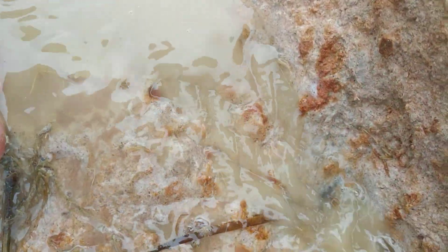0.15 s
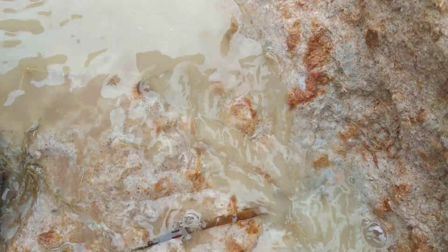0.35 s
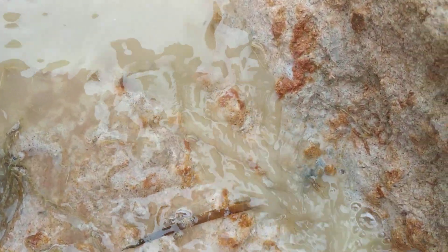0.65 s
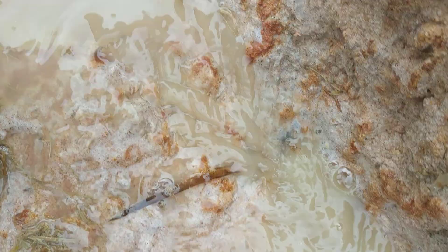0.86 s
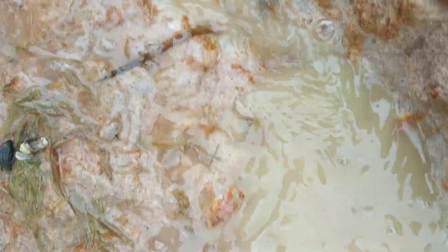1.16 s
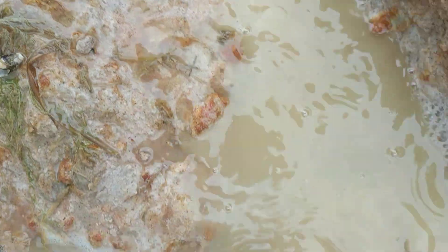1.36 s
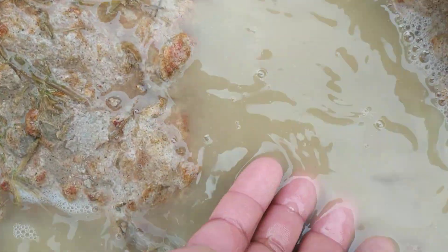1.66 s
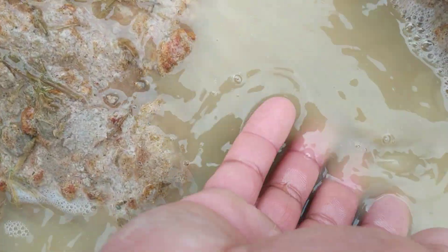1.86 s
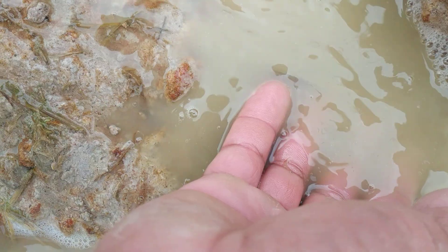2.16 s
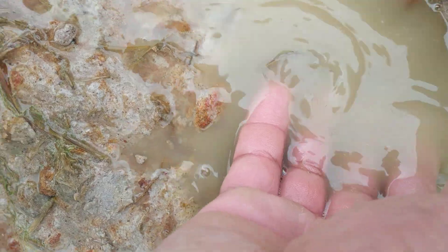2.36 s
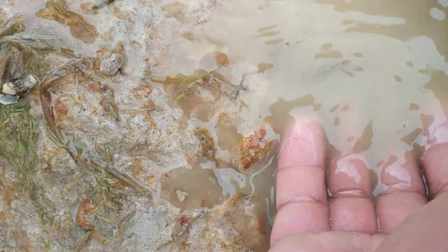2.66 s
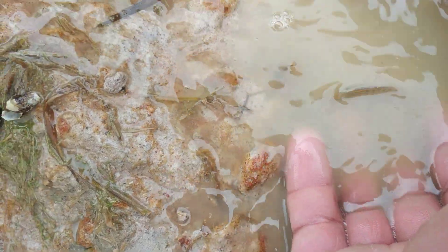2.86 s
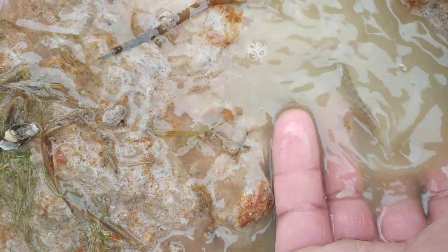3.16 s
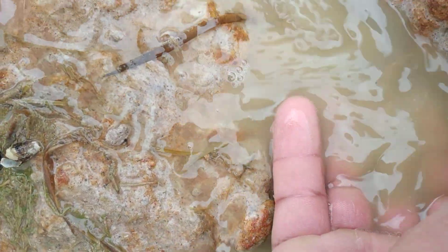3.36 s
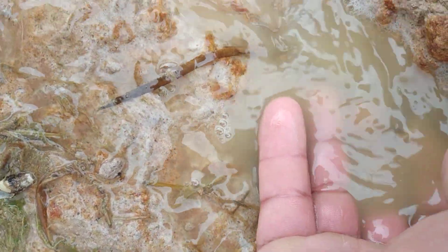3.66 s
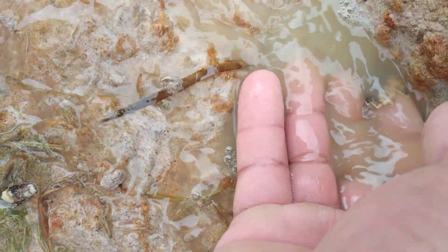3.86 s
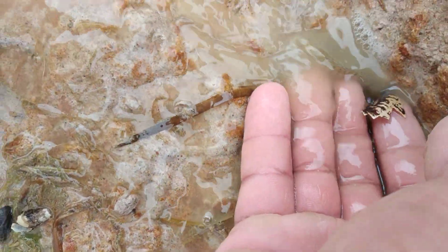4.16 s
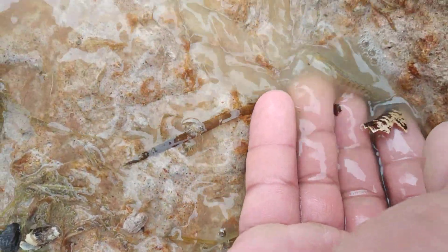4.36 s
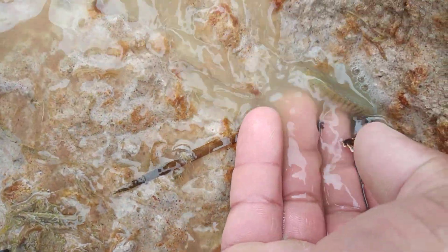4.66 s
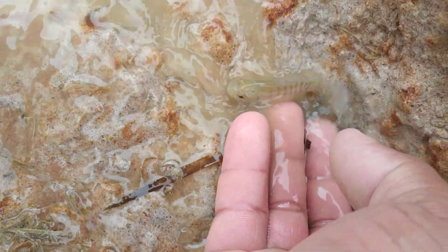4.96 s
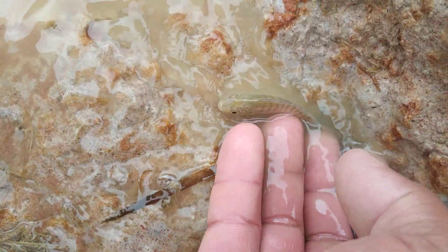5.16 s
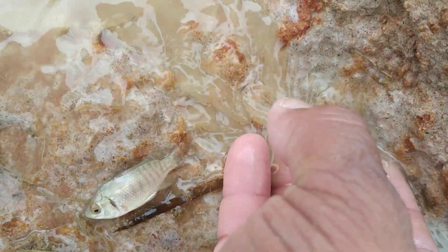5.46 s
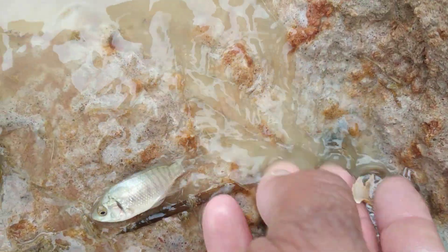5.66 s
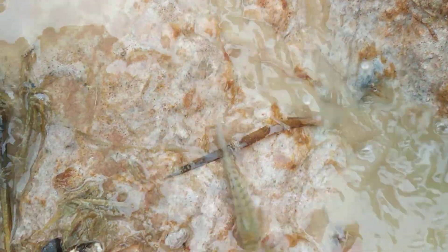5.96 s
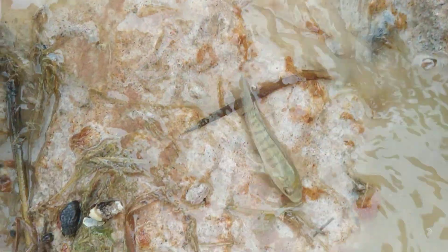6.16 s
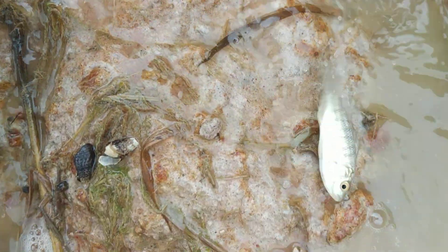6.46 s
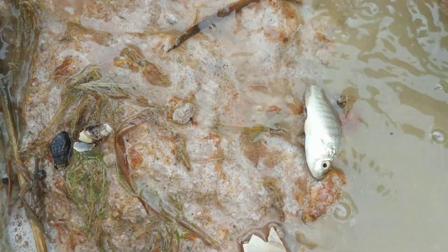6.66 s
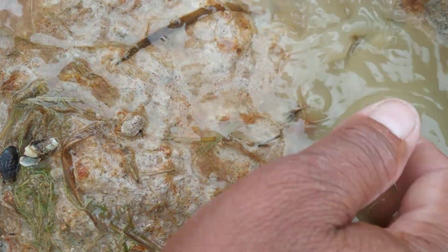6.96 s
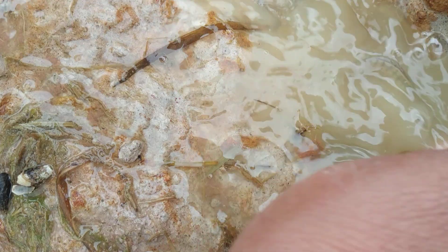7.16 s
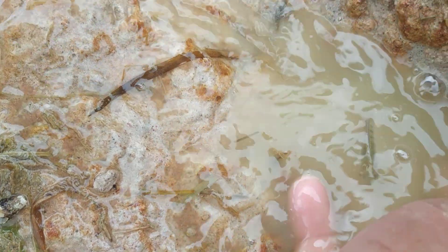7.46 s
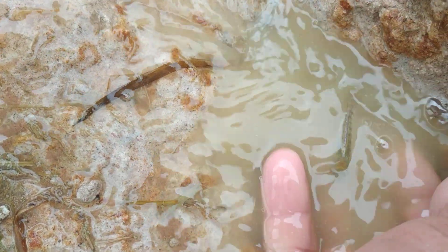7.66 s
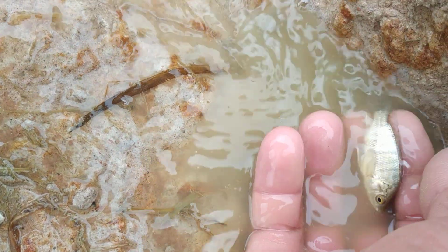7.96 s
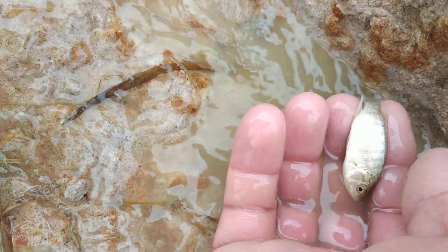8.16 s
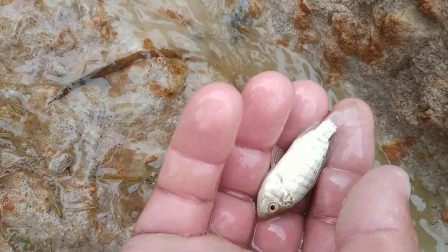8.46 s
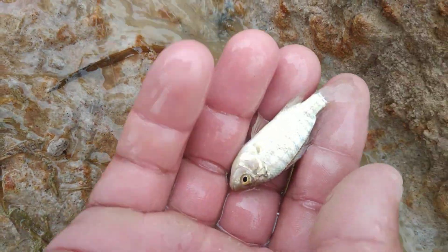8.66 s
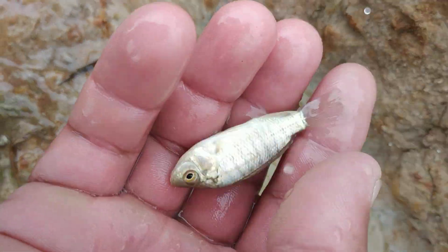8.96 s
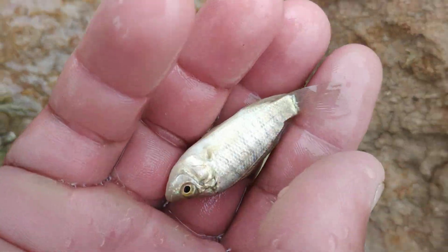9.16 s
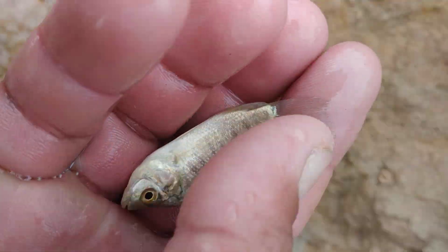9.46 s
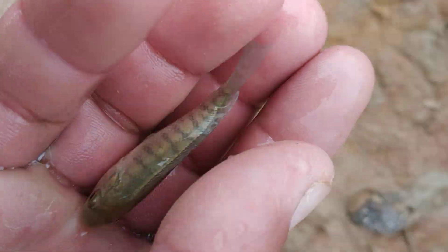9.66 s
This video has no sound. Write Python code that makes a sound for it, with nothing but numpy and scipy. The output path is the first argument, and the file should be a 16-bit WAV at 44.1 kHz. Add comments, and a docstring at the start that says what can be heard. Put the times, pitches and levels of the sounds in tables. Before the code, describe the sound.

Shallow water trickles and sloshes as a hand scoops through it, with bubbly plinks, small splashes and wind gusts on the microphone.

```python
"""At a shallow, trickling pool, a hand scoops through the water near a phone with two microphone ports.
Gusts buffet each port on its own over a far hum and a thin hiss, and a finger taps near the right one.
Trapped bubbles ring as plinks, air pockets squelch shut, drops splat and froth fizzes,
mostly at the left port."""
import sys
import numpy as np
from scipy import signal
from scipy.fft import rfft, irfft, next_fast_len
from scipy.io import wavfile
from scipy.ndimage import uniform_filter1d, map_coordinates

SR = 44100
rng = np.random.default_rng(int(sys.argv[2]) if len(sys.argv) > 2 else 0)


def persist_wave(psi):
    """Save psi, clipped to +-1, as 16-bit WAV."""
    counts = np.round(np.clip(psi, -1, 1) * 32767).astype(np.int16)
    wavfile.write(sys.argv[1], SR, np.atleast_2d(counts).T)


N = 433062


def amp(db):
    """Turns decibels into a number to multiply by."""
    return 10 ** (np.asarray(db) / 20)


def unit(x):
    """Brings each row to an average (rms) level of 1."""
    return x / np.sqrt(np.mean(x ** 2, axis=-1, keepdims=True) + 1e-20)


def along(points, hz):
    """Reads between (frequency, value) points, with octaves evenly spaced."""
    f, values = np.transpose(points)
    return np.interp(np.log(hz + 1), np.log(f + 1), values)


def curves(rows):
    """Joins timed rows with straight lines: one curve for each column after the time."""
    times, *columns = np.transpose(rows)
    return np.array([np.interp(np.arange(N) / SR, times, column) for column in columns])


def wobble(rate):
    """A smooth curve through rate random points a second."""
    return map_coordinates(rng.standard_normal(int(N * rate / SR) + 4), [np.arange(N) * rate / SR])


def filtered(x, response):
    """Turns each frequency of x up or down by response(hz)."""
    size = next_fast_len(N + 8192)
    return irfft(rfft(x, size) * response(np.fft.rfftfreq(size, 1 / SR)), size)[..., :N]


def place(times, sounds):
    """Adds short sounds to one track, each from its start time."""
    at = np.round(np.asarray(times) * SR).astype(int)[:, None] + np.arange(sounds.shape[1])
    return np.bincount(np.clip(at, 0, N).ravel(), sounds.ravel(), N + 1)[:N]


def place_stereo(times, sounds, left_db, right_db, lag):
    """Both ports hear each sound, the left one lag seconds later (earlier if negative)."""
    left = place(times + lag, sounds * amp(left_db)[:, None])
    right = place(times, sounds * amp(right_db)[:, None])
    return np.array([left, right])


def bubble_tones(hz, fade, rise, size):
    """A bubble rings higher as it nears the surface, dying by 60 dB in fade seconds."""
    t, hz, fade, rise = np.arange(size) / SR, hz[:, None], fade[:, None], rise[:, None]
    tone = np.sin(2 * np.pi * hz * t * (0.965 + rise * t / fade))
    return tone * amp(-60 * t / fade) * (1 - np.exp(-t * hz / 2.53))


def bursts(hz, fade, width, size):
    """Bursts of noise centred on hz, dying by 60 dB in fade seconds."""
    t, f = np.arange(size) / SR, np.fft.rfftfreq(size, 1 / SR)
    band = np.exp(-.5 * (np.log((f + 1) / hz[:, None]) / width) ** 2)
    noise = irfft(rfft(rng.standard_normal((len(hz), size))) * band, size)
    return unit(noise) * amp(-60 * t / fade[:, None]) * (1 - np.exp(-t / 0.0007))


# Tone of the background at each port: f/Hz, relative level/dB
AIR_TONE_LEFT = [(40, -21.5), (110, -9), (220, 10), (330, -4.5), (540, -11.5), (700, -5.5), (860, -15),
                 (990, -12), (1500, -17), (2000, -12.5), (2500, -24), (2830, -19), (3300, -27), (5500, -25),
                 (7200, -29.5), (9400, -25.5), (10200, -28.5), (12300, -28.5), (13100, -24.5),
                 (15500, -30.5)]
AIR_TONE_RIGHT = [(40, -70), (110, -8.5), (220, 7), (330, 4), (540, -9), (700, -7.5), (860, -12),
                  (990, -23), (1500, -20), (2000, -21), (2830, -28.5), (3300, -26.5), (5500, -32.5),
                  (9400, -32.5), (10200, -32), (12300, -28.5), (13100, -21), (15500, -32)]
def air(flutter_db=2.6):
    """A far hum, alike at both ports, under a finely fluttering hiss that each has to itself."""
    spectrum = signal.stft(rng.standard_normal((2, N)), nperseg=512)[2]
    patches = uniform_filter1d(rng.standard_normal(spectrum.shape[1:]), 6, axis=0)
    patches = uniform_filter1d(patches, 3, axis=1)
    noise = signal.istft(spectrum * amp(flutter_db * patches / np.std(patches)), nperseg=512)[1][:, :N]
    width = lambda hz: np.arccos(along([(300, 1.0), (700, 0)], hz).clip(0, 1)) / 2
    shared, side = filtered(noise, lambda hz: np.array([np.cos(width(hz)), np.sin(width(hz))]))
    tone = lambda hz: amp([along(AIR_TONE_LEFT, hz), along(AIR_TONE_RIGHT, hz)])
    pair = filtered(np.array([shared + side, shared - side]), tone)
    return amp(-38.0) * pair / np.std(pair[1])


# Wind strength before the bass cut: t/s, left level/dB, right level/dB
RUSH_LEVELS = [(0, -22, -34.5), (.5, -33.5, -38), (1, -29, -37), (1.4, -35, -37), (2, -38.5, -42),
               (3, -33.5, -33), (3.75, -31.5, -33.5), (4.3, -31, -30.5), (4.75, -20, -31),
               (5.02, -19, -26.5), (5.25, -65, -25), (5.5, -20, -43), (5.75, -26, -29.5), (6.05, -25, -36),
               (6.5, -43, -42), (7, -36, -40.5), (8.3, -42, -51), (9.1, -31, -45), (9.82, -48, -52)]
# Its tone before the bass cut: f/Hz, relative level/dB
RUSH_TONE = [(18, -72), (30, -33), (65, 5.5), (232, 8.5), (485, -7), (553, -8.5), (918, -26.5),
             (1030, -30.5), (1500, -42), (1950, -80), (3300, -120)]
def wind_rush():
    """Air swirling at each port makes a low, lumpy rush."""
    lumps = amp(3.5 * np.array([wobble(40), wobble(40)]))
    rush = filtered(rng.standard_normal((2, N)), lambda hz: amp(along(RUSH_TONE, hz)))
    return amp(curves(RUSH_LEVELS)) * unit(lumps * rush)


# Puffs before the bass cut: t/s, level/dB, length/s, rasp against the puff/dB, port (0 left, 1 right)
WIND_PUFFS = [(.033, -12.5, 0.0073, -13, 0), (0.073, -9, 0.0052, -17, 0), (0.113, -17, 0.01, -20, 0),
              (0.127, -6, 0.0054, -18.5, 0), (0.319, -21, 0.0051, -34, 0), (0.39, -14.5, 0.0095, -39, 0),
              (0.538, -20, 0.01, -30, 0), (0.603, -13, 0.0058, -21, 0), (0.822, -34, 0.012, -9, 1),
              (.851, -3.5, 0.0041, -38, 0), (0.854, -24, 0.065, -20, 1), (0.902, -21.5, 0.02, -12, 0),
              (0.913, -6.5, 0.0046, -22, 0), (0.93, -20, 0.01, -10, 0), (0.967, -13.5, 0.0077, -25, 0),
              (1.016, -13.5, 0.0051, -45, 0), (1.094, -14, 0.008, -15, 0), (1.103, -10.5, 0.011, -12, 0),
              (1.284, -21, 0.015, -43, 0), (1.522, -15, 0.0052, -50, 0), (2.438, -15.5, 0.019, -56, 0),
              (3.759, -16, 0.0067, -20, 0), (3.893, -12.5, 0.0064, -23, 0), (3.922, -12, 0.0059, -30, 0),
              (3.969, -15, 0.0083, -33, 0), (4.02, -19, 0.016, -50, 0), (4.148, -9, 0.01, -13, 0),
              (4.164, -15.5, 0.016, -9, 0), (4.4, -13, 0.0087, -18, 0), (4.51, -22, 0.0053, -5, 1),
              (4.547, -17.5, 0.016, -13, 1), (4.624, -8, 0.0062, -37, 0), (4.644, -9.5, 0.015, -16, 0),
              (4.684, -8, 0.0036, -33, 0), (4.703, -12, 0.013, -41, 0), (4.717, -15, 0.0072, -32, 0),
              (4.735, -12, 0.0089, -19, 0), (4.766, -8.5, 0.0057, -34, 0), (4.801, -12.5, 0.014, -3.5, 0),
              (4.84, -16.5, 0.008, -3.5, 0), (4.866, -10, 0.0057, -32, 1), (4.883, -12.5, 0.011, -18, 0),
              (4.962, -11.5, 0.0054, -11, 0), (4.975, -18, 0.04, -29, 1), (5.008, -9.5, 0.013, 0, 0),
              (5.013, -13, 0.004, -3, 1), (5.029, -14, 0.011, -18, 0), (5.118, -25, 0.016, -13, 1),
              (5.173, -24, 0.027, -5.5, 1), (5.233, -20, 0.027, -23, 1), (5.459, -18.5, 0.023, -37, 0),
              (5.476, -7, 0.004, -19, 0), (5.492, -13, 0.014, -16, 0), (5.509, -10.5, 0.0072, -14, 0),
              (5.653, -14.5, 0.0088, -29, 1), (5.763, -19, 0.012, -31, 0), (5.834, -11, 0.018, -27, 0),
              (5.873, -18.5, 0.0067, -9, 1), (5.916, -18.5, .009, -16, 0), (5.971, -18.5, 0.019, -13, 0),
              (6.124, -16, 0.0083, -15, 0), (6.146, -11.5, 0.011, -21, 0), (6.171, -15, 0.022, -25, 0),
              (6.398, -17.5, 0.008, -39, 0), (6.448, -13.5, 0.0044, -56, 0), (6.501, -18, 0.0096, -46, 0),
              (7.014, -16, 0.0077, -53, 0), (7.073, -17.5, .007, -40, 0), (7.259, -13, 0.0068, -49, 0),
              (8.199, -15.5, 0.0063, -35, 0), (8.829, -14.5, 0.0089, -28, 0), (9.214, -17, 0.0075, -32, 0),
              (9.365, -12.5, 0.016, -23.5, 0)]
def wind_puffs(smooth_hz=226.6):
    """Single pushes of air hit one port: they come fast, rasp at their peak and ring down."""
    times, db, length, rasp_db, port = np.transpose(WIND_PUFFS)[:, :, None]
    scatter = np.exp(.07 * rng.standard_normal(times.shape))
    hz = smooth_hz * (1 + 0.48 * amp(rasp_db)) * scatter  # raspy puffs are higher
    t = np.arange(-1500, 2600) / SR
    offset = rng.random((len(times), 2, 1))
    past_peak = t / length + 0.19
    swell = np.exp(-np.where(past_peak < 0, 3.2, 1.9) * abs(past_peak) ** 1.3)
    waver = 0.5 * np.sin(2 * np.pi * (0.538 * hz * t + offset[:, 1]))
    phase = 2 * np.pi * (hz * t + offset[:, 0]) + waver
    overtones = amp(rasp_db / 3) * swell * (np.cos(2 * phase) + 0.26 * swell * np.cos(3 * phase))
    push = np.sqrt(2) * swell * (np.cos(phase) + 0.78 * overtones)
    rasp_band = signal.butter(3, [330, 850], "band", fs=SR, output="sos")
    rasp = unit(signal.sosfilt(rasp_band, rng.standard_normal(swell.shape)))
    puffs = amp(db) * (push + amp(rasp_db) * swell ** 3 * rasp)
    return np.array([place(times[:, 0] + t[0], puffs * (port == side)) for side in range(2)])


def wind():
    """Rush and puffs together; the phone's wind filter cuts their deep bass."""
    bass_cut = signal.butter(4, 168, "high", fs=SR, output="sos")
    return signal.sosfilt(bass_cut, wind_rush() + wind_puffs())


def bubble_crowd(centre_hz, scatter, cycles, wet, count):
    """Many short bubbles at random times, places, pitches and sizes, each with a wet tick."""
    when, rise, delay = rng.random((count, 3)).T
    pitch, damping, side, loudness = rng.standard_normal((count, 4)).T
    hz = (centre_hz * np.exp(scatter * pitch)).clip(900, 15000)
    db = 5 * loudness.clip(-3, 1.3)
    fade = cycles / hz * np.exp(0.3 * damping)
    rings = bubble_tones(hz, fade, 0.2 * rise ** 3, size=640)
    ticks = wet * bursts(hz, fade, width=0.18, size=640)
    pair = place_stereo(when * N / SR, rings + ticks, db, db + 5.3 * side, lag=-.00045 * delay)
    return pair / np.std(pair)


# Flow before the ports colour it: t/s, large bubbles' level/dB, small bubbles' level/dB
TRICKLE_LEVELS = [(0, -51, -60), (.7, -44.5, -52), (1.3, -52.5, -59.5), (2.3, -51, -54),
                  (3.6, -49.5, -56.5), (4.3, -45.5, -58), (4.9, -47, -61.5), (5.7, -43, -50),
                  (6.4, -47, -50), (7.5, -48, -57.5), (8.4, -48.5, -59.5), (9.82, -52.5, -52.5)]
# How each port colours the trickle: f/Hz, boost/dB
TRICKLE_TONE_LEFT = [(1000, -20.5), (2100, 2), (2500, 1), (2850, -15.5), (3500, 3.5), (4500, 2), (7000, 8),
                     (10000, 4), (15500, 11.5)]
TRICKLE_TONE_RIGHT = [(1000, -4.5), (2100, -5.5), (2500, -1), (2850, 0), (3500, -10.5), (7000, 1.5),
                      (10000, -29), (13500, 11), (15500, -14)]
def trickle():
    """Running water makes clumps of large and small bubbles, with fine spatter above."""
    large_db, small_db = curves(TRICKLE_LEVELS)
    large_flow = amp(large_db + 2 * wobble(5) + 2.5 * wobble(25))
    large = large_flow * bubble_crowd(2050, scatter=.17, cycles=22, wet=0.55, count=2600)
    small_flow = amp(small_db + 2.5 * wobble(7))
    small = small_flow * bubble_crowd(3600, scatter=.15, cycles=36, wet=.9, count=3200)
    spatter_flow = amp(small_db - 6.5 + 5.1 * wobble(16))
    spatter = spatter_flow * bubble_crowd(9080, scatter=0.34, cycles=74, wet=2.9, count=450)
    tone = lambda hz: amp([along(TRICKLE_TONE_LEFT, hz), along(TRICKLE_TONE_RIGHT, hz)])
    return filtered(large + small + spatter, tone)


# Touches on the phone's case: t/s, right level/dB, f/Hz
FINGER_TAPS = [(6.398, 8.5, 1430), (6.4, -6, 2600), (6.4201, -8, 2230), (6.4298, -13, 2000),
               (6.4346, -12, 1800), (6.436, 7, 1680), (6.4375, -8, 1900), (6.4397, -4, 1450),
               (6.4443, -8, 1780), (6.4875, -18, 2400), (6.4928, 2.5, 2130), (6.4957, -5, 2170),
               (6.5002, -9, 1730), (6.512, 1.5, 1510), (6.5229, -1.5, 1690), (6.526, -9, 1900),
               (6.542, -10, 2770), (8.3, -9, 2830), (8.3036, 8.5, 2280), (8.3044, -13, 2260),
               (8.3098, -1, 1870), (8.3111, 2.5, 1710), (8.315, -10, 1600), (8.319, -9, 1800),
               (8.3242, -6, 3020), (8.327, -4, 2940), (8.346, -8, 2360), (8.3517, 8, 2660),
               (9.019, -9, 1480)]
def finger_taps(ring_fade_s=0.002, crackle_fade_s=0.0067):
    """A finger knocks the case: a very short ring, a dull thud under it and a crackle."""
    times, db, hz = np.transpose(FINGER_TAPS)
    t = np.arange(512) / SR
    shape = amp(-60 * t / ring_fade_s) * (1 - np.exp(-t / .0002))
    ring = -np.sin(2 * np.pi * hz[:, None] * t) * shape
    thud = -0.19 * np.sin(2 * np.pi * 700 * t) * shape
    crackle = 0.22 * bursts(0.98 * hz, np.full(len(times), crackle_fade_s), width=1.0, size=512)
    pair = place_stereo(times, ring + thud + crackle, db - 26, db, lag=0.00015)
    return signal.sosfilt(signal.butter(2, 350, "high", fs=SR, output="sos"), pair)


# Fizz after a scoop: middle t/s, length/s, left level/dB, centre f/Hz
FROTH_PATCHES = [(0.485, 0.13, -50, 4800), (0.781, 0.034, -38.5, 5500), (4.911, 0.042, -34, 2200),
                 (4.925, 0.034, -31.5, 5370), (5.012, 0.067, -43.5, 4900), (5.383, 0.092, -38, 2300),
                 (5.401, 0.086, -38.5, 5170), (5.842, 0.043, -42, 7960), (5.937, 0.03, -41.5, 8100),
                 (6.233, 0.033, -37.5, 12500), (6.252, 0.043, -37.5, 4400), (6.28, 0.053, -48, 7300),
                 (6.502, 0.11, -49, 8000), (8.04, 0.061, -50, 10100), (8.309, 0.026, -32, 6950),
                 (9.713, 0.018, -30.5, 2800), (9.74, 0.045, -39, 7500)]
def froth():
    """Bursting froth makes a grainy hiss that swells and fades, much nearer the left port."""
    times, length, db, hz = np.transpose(FROTH_PATCHES)
    t = np.arange(-4096, 4096) / SR
    swell = np.exp(-2.5 * (t / length[:, None]) ** 2) * amp(db)[:, None]
    no_fade = np.full(len(times), np.inf)
    hiss = [place(times + t[0], swell * bursts(hz, no_fade, width=.55, size=8192)) for _ in range(2)]
    grain = amp(2.8 * wobble(300))
    return np.array(hiss) * grain * amp([[0], [-11]])


# Air pockets closing under the hand: t/s, left level/dB, start f/Hz, end f/Hz, length/s
AIR_POCKETS = [(5.334, -12.5, 1980, 5500, 0.0078), (5.355, -9.5, 1720, 4250, 0.0092),
               (5.447, -30, 2030, 3000, 0.0087), (5.46, -14.5, 3400, 5230, 0.0068),
               (7.054, -32.5, 950, 1600, .02)]
def squelches():
    """An air pocket is squeezed shut: a wet tone swells, sweeps up ever faster and fades."""
    times, db, start_hz, end_hz, length = np.transpose(AIR_POCKETS)[:, :, None]
    progress = np.arange(1024) / SR / length
    hz = start_hz * (end_hz / start_hz) ** (progress.clip(0, 1) ** 2)
    roughness = 1 + 0.42 * unit(uniform_filter1d(rng.standard_normal(progress.shape), size=12))
    swell = (1 - np.exp(-progress / 0.24)) * np.exp(-3 * progress ** 2)
    tones = roughness * swell * np.sin(2 * np.pi * np.cumsum(hz, axis=1) / SR)
    return place_stereo(times[:, 0], tones, db[:, 0], db[:, 0] - 9, lag=-0.000033)


# Bursting drops: t/s, left level/dB, centre f/Hz, fade/s
DROPS = [(0.034, -23, 6920, 0.0051), (0.441, -19.5, 5500, 0.0043), (0.487, -28.5, 6000, 0.024),
         (1.226, -29, 8450, 0.0089), (1.459, -29.5, 6700, 0.01), (2.2862, -27, 8340, 0.0067),
         (2.3796, -26, 7390, 0.012), (2.654, -26, 6720, 0.011), (3.011, -20, 5430, 0.0057),
         (3.4965, -9, 6260, 0.0017), (3.6207, -34.5, 8850, 0.11), (3.772, -24.5, 8850, 0.02),
         (3.957, -24.5, 8850, 0.045), (3.998, -24.5, 9100, 0.02), (4.8819, -5.5, 7040, 0.005),
         (4.9256, -24, 6200, 0.015), (4.908, -17, 8000, 0.0099), (4.947, -18, 7000, 0.0097),
         (4.9862, -21, 7600, 0.016), (5.011, -14, 7800, 0.0095), (5.3666, -11, 7350, 0.01),
         (5.387, -14, 8300, 0.018), (5.425, -24, 8780, 0.032), (5.46, -23, 7200, 0.017),
         (5.82, -13.5, 9050, 0.031), (5.863, -11.5, 9640, 0.0088), (5.9217, -12.5, 10300, 0.017),
         (6.017, -29, 10670, .015), (6.048, -4, 5500, 0.0027), (6.092, -17.5, 11100, 0.014),
         (6.3676, -14.5, 8900, 0.022), (6.377, -19, 11000, 0.049), (6.402, -19, 7000, 0.028),
         (6.437, -17, 12000, 0.0074), (6.526, -12.5, 9550, 0.0075), (6.551, -19, 11000, .008),
         (6.5654, -25.5, 11720, .017), (6.607, -28, 10920, 0.02), (6.672, -26.5, 10600, 0.098),
         (6.739, -21.5, 13900, 0.016), (6.9013, -26, 9000, 0.018), (7.34, -28, 11500, 0.011),
         (7.376, -29, 7000, 0.0071), (7.58, -24, 8000, 0.0097), (7.592, -23.5, 7000, 0.0067),
         (7.961, -15, 14000, 0.0048), (7.983, -18.5, 11090, 0.0066), (8.0026, -26, 8130, .015),
         (8.011, -25, 13080, 0.035), (8.048, -20, 10020, 0.011), (8.075, -21, 9000, 0.0083),
         (8.2576, -22, 14000, 0.0066), (8.3034, -4, 11000, 0.0065), (8.3167, -3, 8290, 0.0052),
         (8.341, -13.5, 9310, 0.02), (8.422, -24, 5350, 0.0072), (8.792, -16, 4460, 0.0067),
         (8.9428, -17.5, 9700, 0.019), (9.04, -27, 13000, .012), (9.118, -22, 8640, 0.014),
         (9.191, -29, 13000, .012), (9.47, -29, 9000, 0.021), (9.705, -14, 12500, 0.062),
         (9.7815, -19, 8000, 0.016)]
def splats(right_db=-14.5):
    """Each drop bursts in a short, bright noise, weaker at the right port."""
    times, db, hz, fade = np.transpose(DROPS)
    return np.array([place(times, bursts(hz, fade, width=0.78, size=4096) * amp(level)[:, None])
                     for level in (db, db + right_db)])


# Bubbles that stand out: t/s, left level/dB, f/Hz
PLINKS = [(0.1234, -23.5, 2120), (.194, -26.5, 1740), (0.265, -23, 2150), (.321, -31, 2100),
          (.345, -21.5, 2110), (0.449, -21.5, 1680), (0.469, -23, 1720), (0.477, -26, 3300),
          (0.49, -22, 2550), (.637, -20.5, 3530), (.705, -26, 2170), (0.7257, -20.5, 1980),
          (0.7484, -26, 2210), (0.779, -21.5, 1670), (.9807, -24, 4240), (1.226, -24, 1490),
          (1.7479, -29, 3590), (1.8477, -25.5, 2210), (1.849, -22, 3550), (1.9312, -21, 2180),
          (2.0715, -26, 1840), (2.545, -26.5, 2250), (2.58, -25.5, 2020), (2.6885, -23.5, 1960),
          (2.829, -26, 1910), (3.011, -16.5, 6400), (3.0126, -25.5, 1970), (3.176, -21, 2160),
          (3.214, -22.5, 2180), (3.4943, -15, 2200), (3.6182, -24, 1870), (3.6933, -20, 2090),
          (3.7728, -23, 2030), (3.897, -25, 1780), (3.923, -22.5, 1800), (3.9564, -28, 1740),
          (3.9907, -24, 2070), (4.3973, -17, 2190), (4.4762, -25.5, 2240), (4.5487, -26, 2370),
          (4.5667, -21, 2420), (4.572, -19.5, 1800), (4.5878, -17, 2270), (4.6223, -26, 1850),
          (4.6383, -17, 2220), (4.75, -26, 2270), (4.789, -23.5, 2240), (4.885, -16.5, 2200),
          (4.896, -22, 1900), (4.9028, -17, 2180), (4.914, -4, 3850), (4.917, -19, 6070), (4.926, -8, 4680),
          (4.9335, -15, 7500), (4.937, -11.5, 7950), (4.966, -19, 2440), (4.987, -10.5, 4030),
          (5.0098, -9.5, 4100), (4.9922, -17, 2940), (5.026, -21, 2420), (5.037, -16, 4300),
          (5.0469, -21, 2380), (5.097, -24, 2200), (5.123, -19, 1760), (5.132, -20, 2160),
          (5.145, -29, 1830), (5.1906, -29, 2380), (5.212, -23.5, 4170), (5.251, -24, 4140),
          (5.257, -24, 2540), (5.3456, -12, 4080), (5.368, -6, 4540), (5.3883, -5, 4500),
          (5.4084, -7.5, 2840), (5.414, -21, 1620), (5.425, -10.5, 4020), (5.573, -21.5, 2200),
          (5.6106, -28, 2400), (5.7613, -31, 2500), (5.8207, -14, 1850), (6.0486, -9.5, 4200),
          (6.093, -18, 3860), (6.226, -25, 1570), (6.253, -20, 1790), (6.274, -24, 2220),
          (6.305, -33, 1860), (6.3296, -23, 2300), (6.3653, -15, 4300), (6.543, -20, 2900),
          (6.6872, -27, 2150), (6.854, -22.5, 4700), (6.896, -15.5, 3670), (6.966, -25.5, 1120),
          (7.034, -17.5, 720), (7.054, -20.5, 2630), (7.375, -22.5, 1140), (7.537, -23.5, 2400),
          (7.375, -22.5, 2190), (7.6428, -23, 1090), (7.6424, -19, 1950), (7.7018, -22.5, 2470),
          (7.7853, -21, 2420), (8.1372, -28, 1770), (8.1606, -19.5, 2400), (8.2657, -21.5, 5030),
          (8.4204, -23, 1980), (8.4731, -25.5, 2400), (8.7033, -27, 1820), (8.7913, -16.5, 2370),
          (8.884, -28, 2010), (9.471, -22, 2090), (9.7026, -5.5, 3730)]
# Smaller, higher bubbles die sooner: f/Hz, fade/s
PLINK_FADES = [(1200, 0.024), (2200, 0.022), (4500, 0.008)]
# The high ones burst near the left port: f/Hz, left minus right level/dB
PLINK_SIDES = [(2200, 5.5), (3500, 19.5)]
def plinks():
    """Single bubbles ring with a wet slap; the louder the bubble, the bigger the slap's share."""
    times, db, hz = np.transpose(PLINKS)
    fade = along(PLINK_FADES, hz)
    rise = 0.02 + 0.2 * rng.random(len(times)) ** 2
    rings = bubble_tones(hz, fade, rise, size=1024)
    slaps = (0.21 + 0.4 * amp(db / 2))[:, None] * bursts(hz, fade, width=0.5, size=1024)
    return place_stereo(times, rings + slaps, db, db - along(PLINK_SIDES, hz), lag=-0.00011)


def scene():
    """Everything that reaches the two ports, added together."""
    return air() + wind() + plinks() + splats() + squelches() + froth() + trickle() + finger_taps()


def record(dry):
    """The ports soften a narrow band near 2800 Hz, and the phone keeps nothing above 15800 Hz."""
    dip_db = lambda hz: -5 * np.exp(-((hz - 2800) / 160) ** 2)
    return filtered(dry, lambda hz: amp(dip_db(hz)) * (hz < 15800))


dry = scene()
out = record(dry)
persist_wave(out)
```